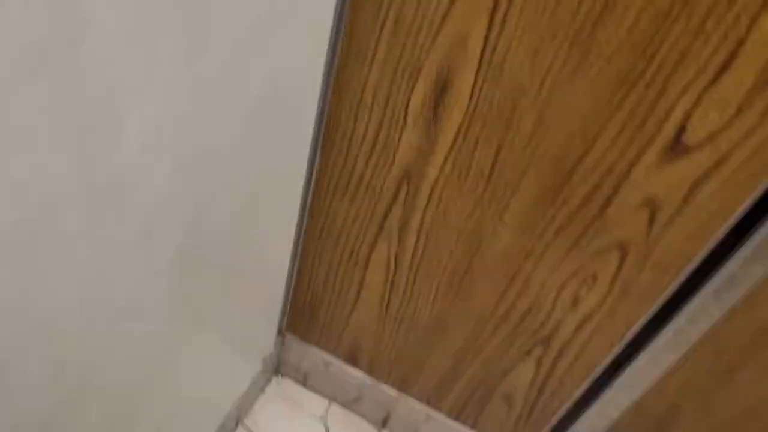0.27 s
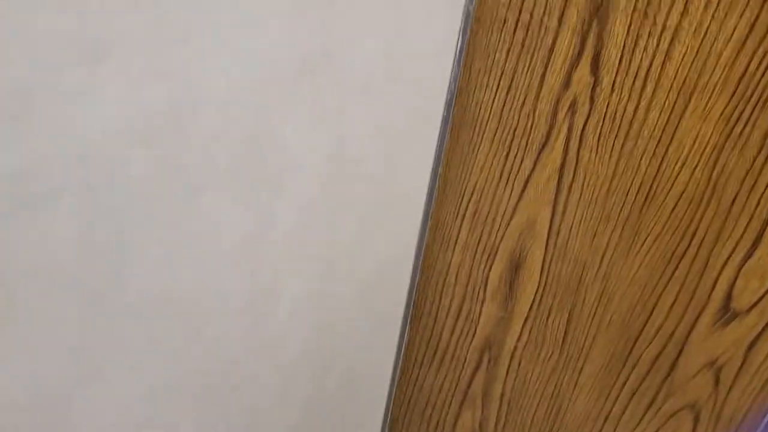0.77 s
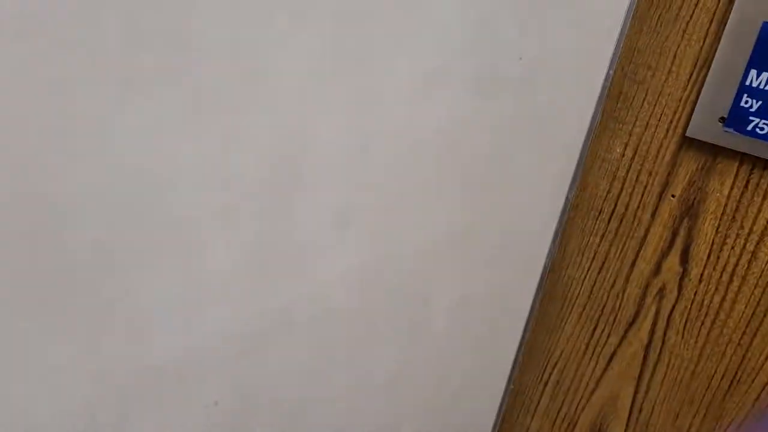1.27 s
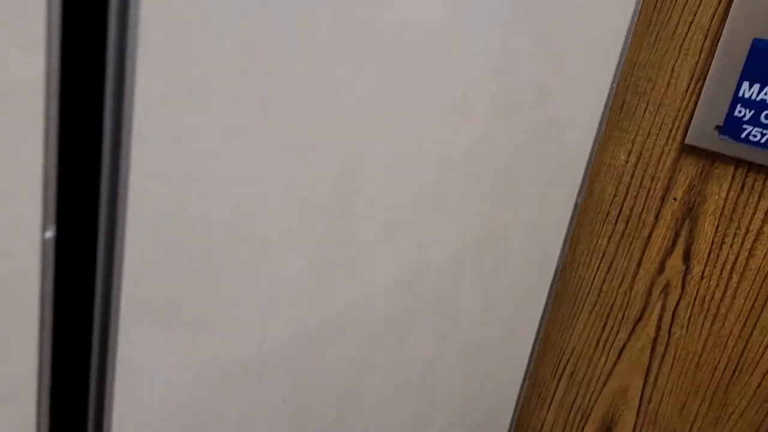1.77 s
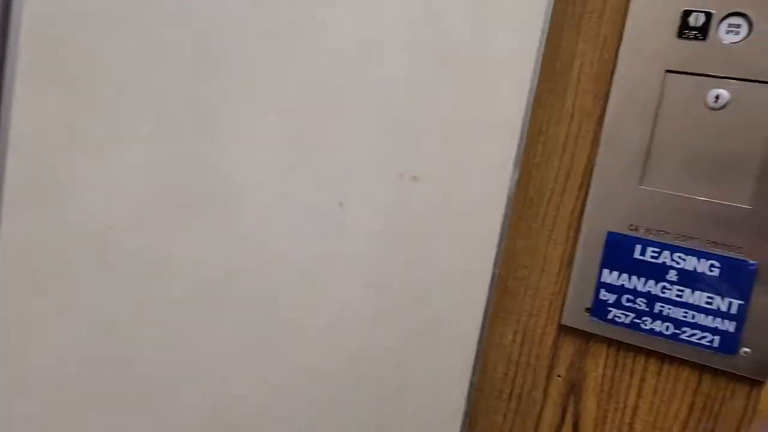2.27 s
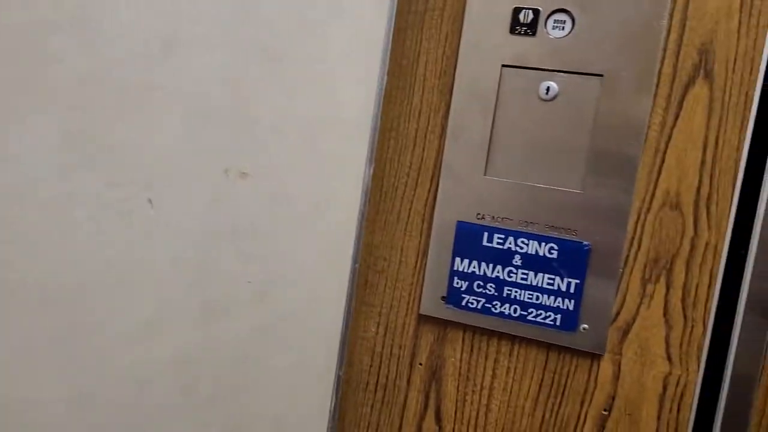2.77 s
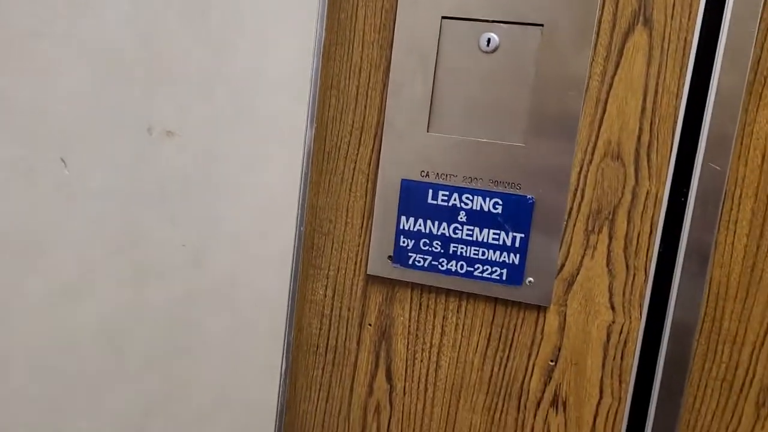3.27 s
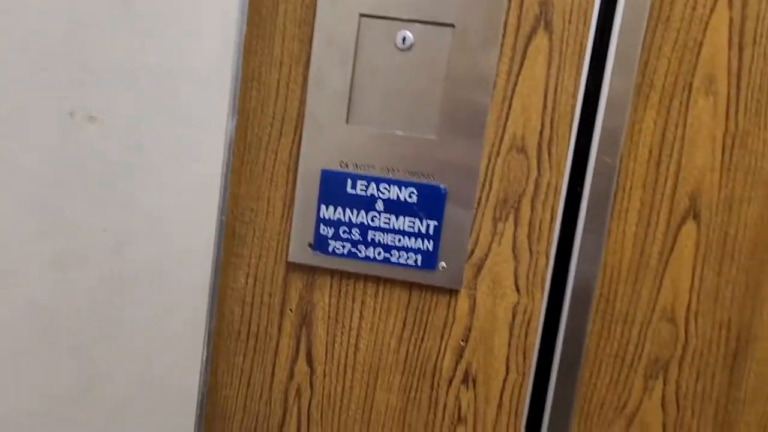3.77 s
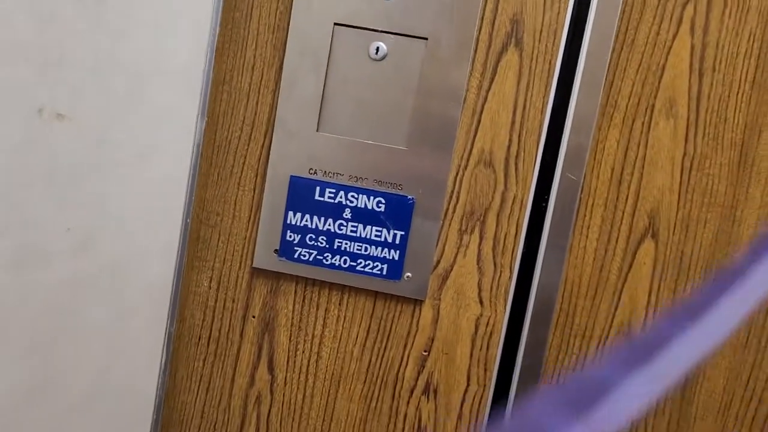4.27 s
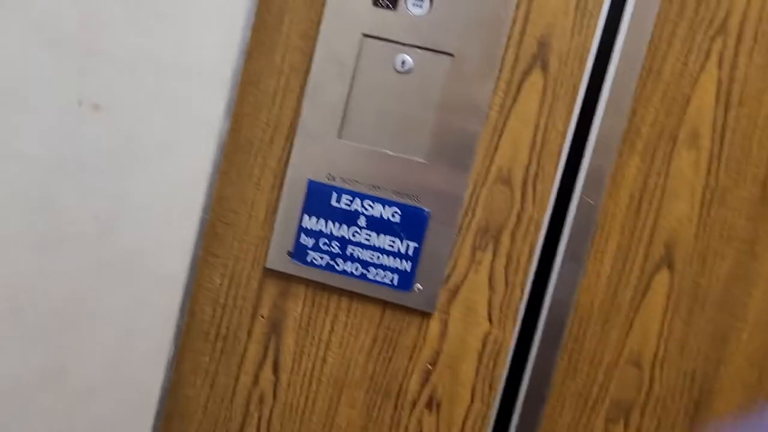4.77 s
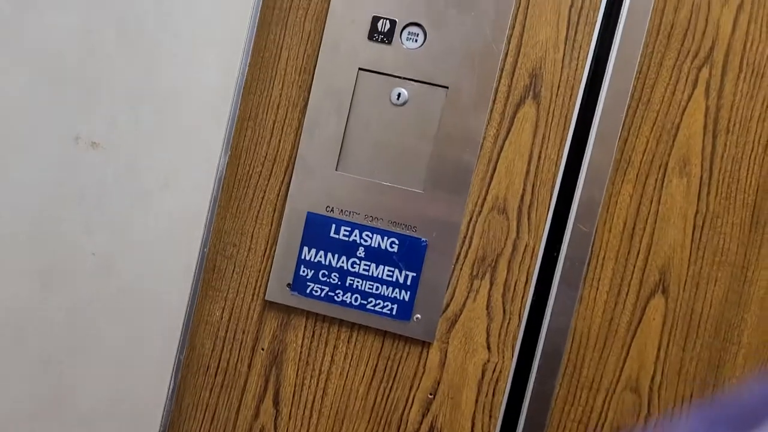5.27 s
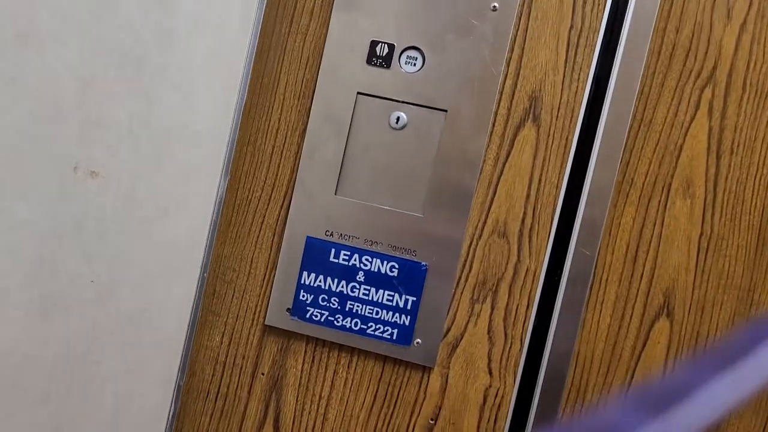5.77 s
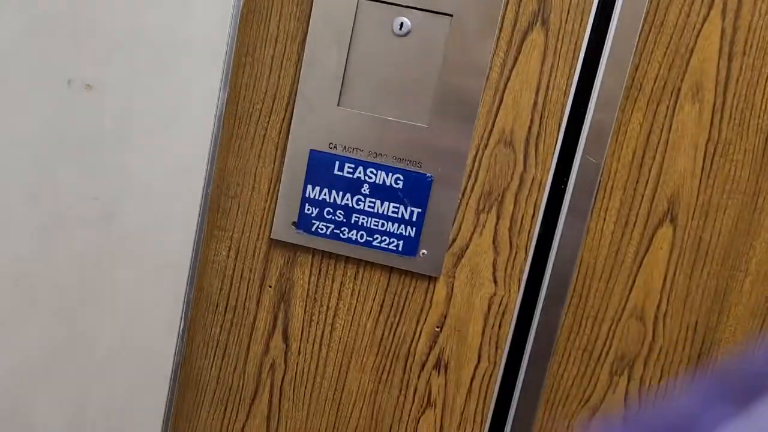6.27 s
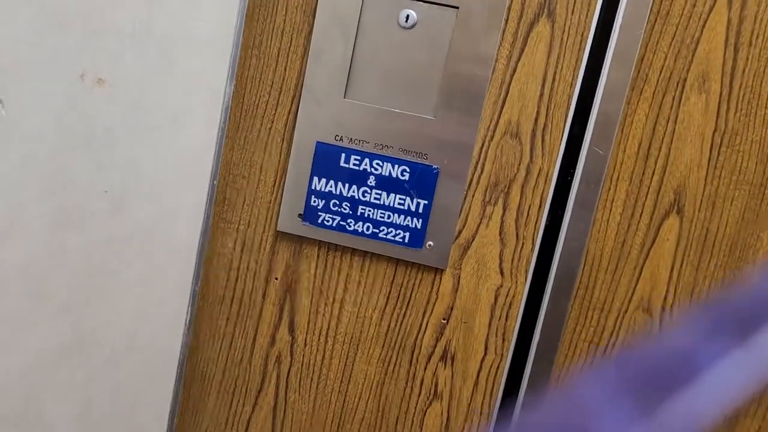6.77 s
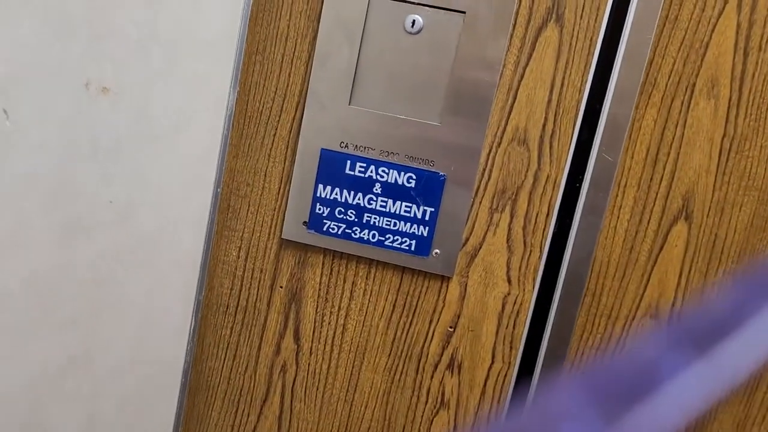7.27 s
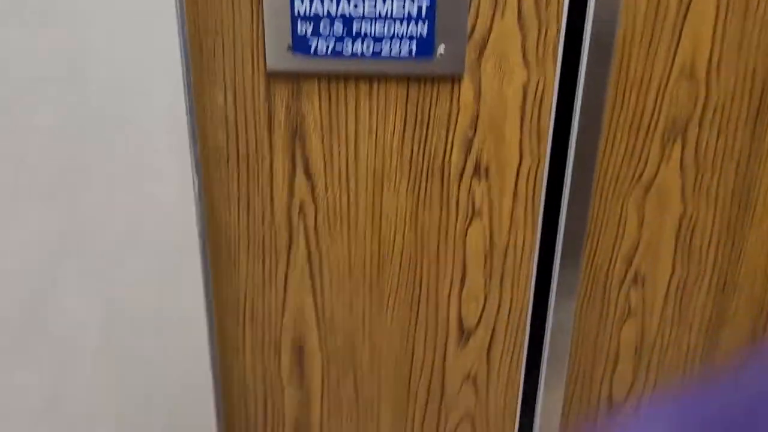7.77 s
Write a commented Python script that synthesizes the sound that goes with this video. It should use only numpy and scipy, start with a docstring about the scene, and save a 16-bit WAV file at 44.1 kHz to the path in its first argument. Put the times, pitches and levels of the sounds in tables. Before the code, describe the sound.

Sandals slap into a small old lift, booming the floor and clanking on a metal sill. A catch snaps, and the door scrapes and squeals faintly on its track, then rumbles shut on worn rollers with a few knocks. A low motor hum remains, with soft clothing rustle and small creaks. Near the end a strap rasps right beside the left of the microphone. Hard walls give everything a short, close echo.

```python
"""Sandals in a small old lift

Inside the cab, on a phone's stereo microphone, hard walls close all round. Sandals slap in, the floor
booms under the weight and a metal sill clanks. A catch snaps; the door rolls shut on worn rollers and
settles, leaving the motor humming through the panels. Clothes rustle, and near the end a strap rasps
right beside the left microphone port."""
import sys
import numpy as np
from scipy import signal
from scipy.fft import rfft, irfft, next_fast_len
from scipy.io import wavfile
from scipy.ndimage import uniform_filter1d

SR = 44100
rng = np.random.default_rng(int(sys.argv[2]) if len(sys.argv) > 2 else 0)


def int16_out(signal):
    """Quantize to a 16-bit WAV file."""
    q = np.round(np.clip(np.atleast_2d(signal).T, -1, 1) * 32767)
    wavfile.write(sys.argv[1], SR, q.astype(np.int16))


N = 353682
TIME = np.arange(N) / SR
CRACKLE_S = .02  # the longest decay of a contact's crackle

# Footfalls. Each row: start in seconds, slap in dB, treble tilt in dB per octave, contact in ms,
# floor boom in dB, panel shudder in dB, shudder decay in seconds.
STEPS = [(0.056, -33, -1, 5.1, -41.5, -51.5, 0.04), (0.13, -33.5, -1, 5.2, -43.5, -57, 0.025),
         (0.415, -31, 0, 8.1, -40.5, -47, 0.065), (0.703, -28, -0.5, 5.5, -24.5, -46, 0.72),
         (1.195, -48.5, -6, 4, -47, -50.5, 0.075), (1.259, -25, 0.5, 2.9, -33, -40, 0.11),
         (1.343, -28, -2.5, 4.9, -39, -44, 0.053), (1.594, -46, -6, 170, -45.5, -56.5, 0.083),
         (1.72, -34, -2, 16, -59, -34.5, 0.11), (1.746, -37, -3.5, 12, -49.5, -27.5, 0.027),
         (1.781, -28, -6.5, 20, -36.5, -28.5, 0.06), (1.9, -39.5, -12, 27, -32.5, -38, 0.14),
         (2.165, -43, -5.5, 0.32, -44.5, -44.5, 0.19), (2.334, -31, -3, 310, -46.5, -34, 0.066),
         (2.937, -54, -3.5, 3.3, -61, -45, 0.29), (3.038, -26, -0.5, 20, -37.5, -38, 0.017)]


def amp(db):
    """Decibels to gain."""
    return 10 ** (np.asarray(db) / 20)


def unit(x):
    """Scale to rms 1."""
    return x / np.sqrt(np.mean(x ** 2))


def blow(x, db):
    """Scale a transient so that its energy, spread over 20 ms, has this level."""
    return x * amp(db) * np.sqrt(SR / 50 / np.sum(x ** 2))


def lookup(hz, rows):
    """Read (Hz, value) rows on a log-frequency axis."""
    points, values = np.transpose(rows)
    return np.interp(np.log(hz + 1), np.log(points), values)


def colour(x, rows, tilt_db=0, size=8192):
    """Causal filter through (Hz, dB) points, treble tilted per octave; white noise keeps its power."""
    hz = np.fft.rfftfreq(size, 1 / SR)
    curve_db = lookup(hz, rows) + tilt_db * np.log2(1 + hz / 1000)
    cepstrum = irfft(np.log(amp(curve_db)))
    response = irfft(np.exp(rfft(2 * cepstrum[:size // 2], size)))  # minimum phase
    response /= np.linalg.norm(response)
    n = next_fast_len(x.shape[-1] + size)
    return irfft(rfft(x, n) * rfft(response, n), n)[..., :x.shape[-1]]


def noise(rows, channels=1):
    """Coloured noise, rms 1, unrelated between channels."""
    return unit(colour(rng.standard_normal((channels, N)), rows))


def wander(per_s):
    """Smooth random drift, rms 1, with per_s new values a second."""
    hold = int(SR / per_s)
    stairs = np.repeat(rng.standard_normal(N // hold + 1), hold)
    return unit(uniform_filter1d(uniform_filter1d(stairs, hold), hold)[:N])


def stroke(peak_s, rise_s, fall_s, roundness=0.6, t=TIME):
    """Gain of one movement: up 20 dB over rise_s to 1 at its peak, down 20 dB over fall_s."""
    away = np.maximum((peak_s - t) / rise_s, (t - peak_s) / fall_s)
    return amp(-20 * np.minimum(np.abs(away) ** roundness, 10))


def burst(decay_s):
    """A second of dense tiny impacts that die away."""
    return rng.standard_normal(SR) * np.exp(-TIME[:SR] / max(decay_s, 1 / SR))


def ring(modes):
    """A second of struck (Hz, dB, t60 in seconds) modes."""
    t = TIME[:SR]
    return sum(amp(db) * np.sin(2 * np.pi * hz * t) * np.exp(-np.log(1000) * t / t60)
               for hz, db, t60 in modes)


def resonance(hz, width_hz):
    """A short, rounded ring of a damped part."""
    t = TIME[:SR // 8]
    return t * np.exp(-np.pi * width_hz * t) * np.sin(2 * np.pi * hz * t)


def add(out, s, x):
    """Mix x into out at s seconds."""
    i = max(int(s * SR), 0)
    out[..., i:i + x.shape[-1]] += x[..., :N - i]


def echoes(contact_s=1e-5, spread=1.13, bass_spread=0.25, size=24576):
    """Close hard walls: a dense tail that builds during contact, alike at both ports only in the bass."""
    # How long the cab rings. Each row: frequency in Hz, t60 in seconds.
    ring_times = np.array([(150, 0.5), (500, 0.41), (1200, 0.36), (2500, 0.3), (5000, 0.25), (9000, 0.19),
                           (16000, 0.22)])
    t, hz = TIME[:size], np.fft.rfftfreq(size, 1 / SR)
    mid, side = rfft(rng.standard_normal((2, size)))
    width = np.hypot(bass_spread, spread * hz / np.hypot(hz, 560))
    field = (mid + width * side * np.array([[1], [-1]])) / np.hypot(1, width)
    tail = 0
    for share, (_, t60) in zip(np.eye(len(ring_times)), ring_times):
        band = lookup(hz, np.column_stack([ring_times[:, 0], share]))
        tail = tail + irfft(field * band) * np.exp(-np.log(1000) * t / t60)
    tail = tail * np.sqrt(1 - np.exp(-t / contact_s))
    return tail / np.linalg.norm(tail, axis=1, keepdims=True)


def cab(x, direct_db, bass_spread=0.22):
    """A source at the microphone: its direct sound, direct_db above the walls' echoes that follow."""
    response = echoes(bass_spread=bass_spread)
    response[:, 0] += amp(direct_db)
    return signal.fftconvolve(x[None], response / np.hypot(1, amp(direct_db)), axes=1)[:, :N]


def motor():
    """Wavering motor tones come through the walls over a bed of moving air."""
    # Motor tones, then the spectrum of the shaft's air. Each row: frequency in Hz, relative level in dB.
    tones = [(70, -79), (118.8, -73), (141, -79), (176.5, -77), (241, -78.5), (281, -81), (565, -100)]
    air_spectrum = [(20, -9.5), (60, -10), (90, -9), (120, 2.5), (200, -11), (285, -1.5), (340, -12),
                    (450, -15.5), (700, -26), (1200, -35), (4000, -40.5), (16000, -43)]
    # The rise and fall of both. Each row: time in seconds, gain in dB.
    swell = [(0, 17), (4.8, -2), (5.9, 1.5), (6.6, -3), (6.87, 0), (7.1, -2.5), (8.02, -6.5)]
    waver_hz, waver_db = 2.3, 2.9
    hum = 0
    for hz, db in tones:
        phase = 2 * np.pi * np.cumsum(hz + waver_hz * wander(7.7)) / SR
        hum = hum + np.sqrt(2) * amp(db + waver_db * wander(8.6)) * np.sin(phase)
    air = cab(amp(-71.0) * noise(air_spectrum)[0], direct_db=-0.5, bass_spread=0.43)
    return (hum + air) * amp(np.interp(TIME, *np.transpose(swell)))


def sway():
    """The cab rumbles on its ropes, most after each lurch and while the door rolls."""
    # Shifts of weight. Each row: peak in seconds, level in dB.
    lurches = [(0, -53.5), (.42, -54.5), (1.277, -46), (1.79, -39.5), (2.38, -51), (3.05, -45.5)]
    idle_db, door_share_db = -77, -14.5
    lurch_power = sum((amp(db) * stroke(s, rise_s=0.044, fall_s=0.68, roundness=0.88)) ** 2
                      for s, db in lurches)
    gain = np.sqrt(lurch_power + (amp(door_share_db) * door_effort()) ** 2 + amp(idle_db) ** 2)
    rumble = noise([(12, -25.0), (24, -1.5), (33, 7.5), (48, 3), (68, 1.5), (90, -18.0), (200, -64.5)])
    return amp([[-1.5], [1]]) * gain * rumble


def clothes():
    """Cloth slides on cloth with a fine, flickering hiss from all sides, some strokes brighter."""
    # The spectrum of cloth. Each row: frequency in Hz, relative level in dB.
    cloth = [(150, -1.5), (430, 5), (800, -0.5), (2000, 0), (3200, -5.5), (5500, -2), (7500, 1.5),
             (9000, -5.5), (12500, -3.5), (16000, -12)]
    # Swishes. Each row: peak in seconds, level in dB, rise and fall in seconds, tilt in dB per octave.
    swishes = [(0, -58.5, .3, 0.73, -2.4), (0.669, -57, 0.383, 0.57, -2.1), (1.622, -63, 0.27, 0.42, 0.2),
               (1.97, -52.5, 0.13, 0.23, -3.1), (2.4, -55.5, 0.44, 0.21, -5.5),
               (3.418, -72, 0.095, 0.72, -1.5), (4.54, -67.5, 0.39, 0.28, 1), (5.3, -70, 0.23, 0.91, 4.7),
               (5.62, -71, 1, 0.85, .4), (6.221, -72.5, 0.94, 0.55, -2), (7.19, -72, 0.34, 0.45, 3),
               (7.641, -67, 0.24, 0.4, -2.5), (8.0, -64.5, 0.18, .2, 0)]
    flicker_db = 1.8
    out = 0
    for s, db, rise_s, fall_s, tilt_db in swishes:
        hiss = colour(rng.standard_normal((2, N)), cloth, tilt_db)
        out = out + amp(db) * stroke(s, rise_s, fall_s, roundness=1.06) * hiss
    return out * amp(flicker_db * wander(35))


def squeal(phase, flutter_per_s=380):
    """Catching metal sings in a narrow resonance: a tone whose level and phase flutter."""
    return wander(flutter_per_s) * np.cos(phase) + wander(flutter_per_s) * np.sin(phase)


def door_track():
    """Dry metal scrapes along the door track and squeals, sinking in pitch as it slows."""
    # The scrape's spectrum. Each row: frequency in Hz, relative level in dB.
    spectrum = [(600, -20.5), (1450, -13), (1700, -17.5), (2120, -10), (2380, -14), (2600, -23.5),
                (3200, -26), (4000, -20.5), (5200, -27), (12000, -44)]
    # Slides. Each row: peak in seconds, scrape in dB, squeal in dB, rise and fall in seconds.
    slides = [(0.05, -65.5, -92, 0.83, 2.5), (1.05, -69, -68.5, 0.28, 0.72), (2.6, -79.5, -70, 0.34, 0.22),
              (3.47, -70.5, -80, 0.09, 0.47)]
    full_speed_hz, sag_hz, octave_db = 2114, 113, -21
    scraping, singing, speed = np.zeros((3, N))
    for s, scrape_db, squeal_db, rise_s, fall_s in slides:
        slide = stroke(s, rise_s, fall_s, roundness=1.25)
        scraping = np.hypot(scraping, amp(scrape_db) * slide)
        singing = np.hypot(singing, amp(squeal_db) * slide)
        speed = np.maximum(speed, slide)
    phase = 2 * np.pi * np.cumsum(full_speed_hz - sag_hz * (1 - speed) ** 2) / SR
    tone = squeal(phase) + amp(octave_db) * squeal(2 * phase)
    scrape = noise(spectrum, channels=2) * scraping * amp(4.6 * wander(23))
    return scrape + cab(tone * singing, direct_db=4.0)


def slap(db, tilt_db, contact_s, direct_db=-12):
    """A short crackle of contact, swallowed at once by its own echoes."""
    # The spectrum of a slap or click. Each row: frequency in Hz, relative level in dB.
    spectrum = [(120, -34), (300, -6), (500, -7.5), (660, -14), (950, -12), (1500, -15), (2300, -12.5),
                (5800, -12), (7600, -11), (9000, -17), (15000, -18)]
    tail = echoes(contact_s)
    crackle = unit(burst(min(contact_s, CRACKLE_S)))[:tail.shape[1]] / np.sqrt(SR)
    return blow(colour(tail + amp(direct_db) * crackle, spectrum, tilt_db), db)


def sandals_and_ticks():
    """Soles slap the floor among lighter scuffs and ticks; each sets the wall boards ringing."""
    # Light scuffs and crisp ticks, including the click of the catch.
    # Each row: start in seconds, level in dB, treble tilt in dB per octave, contact in ms.
    scuffs_and_ticks = [(0.612, -47.5, -7, 3.7), (0.984, -46, -11.5, 20), (1.21, -41, -6.5, 12.3),
                        (1.249, -38, -6.5, 3.1), (1.380, -30, -2, 2.2), (1.969, -44.5, -2.5, 17),
                        (2.312, -39.5, -6, 0.34), (2.967, -45, -0.5, 140), (7.585, -62, -4, .5)]
    # The boards' hollow modes. Each row: frequency in Hz, relative level in dB, t60 in seconds.
    boards = [(395, -7, 0.52), (476, -1.5, 0.36), (569, -4.5, 0.18), (799, -1, 0.13), (960, 1, 0.2),
              (1254, -1, .16), (2410, -3, .08), (3750, -0.5, .1), (4260, -2, 0.11)]
    out = np.zeros((2, N))
    for s, db, tilt_db, contact_ms, *_ in STEPS + scuffs_and_ticks:
        contact_s = contact_ms / 1000
        add(out, s, slap(db, tilt_db, contact_s))
        crackles = [burst(min(contact_s, CRACKLE_S))[:SR // 4] for port in range(2)]
        knock = np.array([signal.fftconvolve(crackle, ring(boards)) for crackle in crackles])
        add(out, s, blow(knock, db - 14.5))
    return out


def floor():
    """Just after each footfall's slap, body weight booms the floor and shakes the panels."""
    # Modes of the floor and walls. Each row: frequency in Hz, relative level in dB, t60 in seconds.
    modes = [(47, -20.5, .5), (117.97, -1.5, 0.69), (162.7, -12, 0.33), (237.5, -11, 0.51),
             (277.5, -6.5, 0.4), (303, -2.5, 0.4), (421, -14.5, 0.39), (510, -16.5, 0.34),
             (645, -18.5, 0.28)]
    # The spectrum of loose panels. Each row: frequency in Hz, relative level in dB.
    panels = [(20, -6), (35, 0), (65, -3.5), (95, -11), (117, 7), (145, -0.5), (163, -2), (188, -2.5),
              (215, -6), (280, 4), (370, -14), (480, -17.5), (700, -25), (1500, -49.5)]
    weight_lag_s, heel_load_s = .016, 0.0075  # a soft heel loads the floor gradually
    boom, shudder = np.zeros((2, N))
    thump = ring(modes) * (1 - np.exp(-TIME[:SR] / heel_load_s))
    for s, *_, boom_db, shudder_db, decay_s in STEPS:
        add(boom, s + weight_lag_s, amp(boom_db) * thump)
        add(shudder, s + weight_lag_s, amp(shudder_db) * colour(burst(decay_s), panels))
    return boom * amp([[.6], [-.6]]) + cab(shudder, direct_db=1.0, bass_spread=0.19)


def sill():
    """The metal sill clanks under a rubber sole, to the right of the microphone."""
    # The sill's modes. Each row: frequency in Hz, relative level in dB, t60 in seconds.
    modes = [(1990, -7, .06), (2067, -1, .1), (2105, 0, .11), (2200, -7, .06), (2850, -10, .04),
             (4690, -12, .05), (6900, -17, .1), (7490, -17, .1), (10280, -17, .1), (13600, -16, .045)]
    # Treads on the sill. Each row: start in seconds, level in dB before panning.
    treads = [(1.724, -35.5), (1.745, -39.5), (1.779, -44.5)]
    sole_load_s = 0.00084
    clank = ring(modes) * (1 - np.exp(-TIME[:SR] / sole_load_s))
    out = np.zeros((2, N))
    for s, db in treads:
        add(out, s, amp([[-.5], [4.5]]) * cab(blow(clank, db), direct_db=0.5))
    return out


def latch(start_s=2.3125):
    """A metal catch snaps once with a short, dull clack."""
    # Its damped resonances. Each row: frequency in Hz, relative level in dB.
    modes = [(942, -0.5), (2100, 2.5), (3074, -2), (3924, 0.5), (4683, -9), (6900, -15.5), (7900, -5.5)]
    clack = sum(amp(db) * resonance(hz, width_hz=420) for hz, db in modes)
    out = np.zeros((2, N))
    add(out, start_s, cab(blow(clack, db=-39), direct_db=-7.0))
    return out


def rubs():
    """Small ticks and creaks: brief spells of friction, each through one resonance."""
    # Each row: start in seconds, level in dB, resonance in Hz, decay in seconds.
    spells = [(2.347, -42, 1240, 0.03), (2.948, -55, 3750, 0.019), (4.235, -63, 682, 0.15),
              (4.8, -69, 680, 0.043), (5.070, -70.5, 1565, 0.052), (5.151, -66, 920, 0.0062),
              (5.637, -69.5, 960, .03), (6.04, -68, 1630, 0.032), (6.15, -64, 435, 0.15),
              (7.585, -61.5, 2760, 0.017)]
    out = np.zeros(N)
    for s, db, hz, decay_s in spells:
        rub = signal.fftconvolve(burst(decay_s), resonance(hz, width_hz=440))
        add(out, s, blow(rub, db))
    return cab(out, direct_db=-1.0)


def door_effort():
    """Gain of the door's run: it gathers speed, cruises, brakes, presses home and runs out."""
    cruise_s, brake_s, home_s = 3.23, 3.795, 4.55
    start_db_per_s, brake_db_per_s, runout_db_per_s = 153, 13.5, 43
    starting = start_db_per_s * np.maximum(cruise_s - TIME, 0)
    braking = brake_db_per_s * np.maximum(TIME - brake_s, 0)
    running_out = runout_db_per_s * np.maximum(TIME - home_s, 0)
    pressing = amp(-47.5) * stroke(home_s, rise_s=0.15, fall_s=0.032)
    return amp(-46.5 - starting - braking - running_out) + pressing


def door():
    """Worn rollers bump the leaf once a turn, and the gear knocks as the door settles."""
    # The door leaf's spectrum. Each row: frequency in Hz, relative level in dB.
    leaf = [(60, -25.5), (98, -12.5), (115, 8.5), (130, -8.5), (143, 10.5), (163, -14.5), (179, 6.5),
            (212, -18), (268, 4.5), (297, 4), (322, -4), (341, 3), (362, -21), (430, -10), (492, -12.5),
            (700, -29), (1200, -64.5)]
    # The rollers' hardest bumps. Each row: start in seconds, level in dB.
    hard_bumps = [(3.507, -53.5), (3.550, -48), (3.591, -45.5), (3.646, -49), (3.725, -50.5), (3.927, -52),
                  (4.262, -51.5)]
    # Knocks of the gear. Each row: start in seconds, thud in dB, thud pitch in Hz, click in dB.
    knocks = [(3.385, -46, 421, -57.5), (3.696, -49, 339, -64), (4.231, -54.5, 399, -74.5),
              (4.467, -57.5, 496, -63), (4.517, -65, 422, -56.5), (4.557, -60, 480, -57),
              (4.71, -65.5, 380, -66.5), (4.795, -61, 470, -65.5)]
    roller_hz, scatter_db = 23.41, 1
    turn = np.cumsum(roller_hz * (1 + .12 * wander(31))) / SR % 1
    push = unit(0.18 + np.exp(-turn / .16)) * rng.standard_normal(N)
    flat_spots = (np.diff(turn, prepend=0) < 0) * amp(scatter_db * rng.standard_normal(N))
    knock = resonance(hz=304, width_hz=210)
    bump = signal.fftconvolve(knock, knock)  # twice: the tyre softens the bump
    bumps = signal.fftconvolve(flat_spots, bump)[:N]
    rolling = (amp(-2.5) * unit(colour(push, leaf)) + amp(-16.5) * unit(bumps)) * door_effort()
    thuds, clicks = np.zeros(N), np.zeros((2, N))
    for s, db in hard_bumps:
        add(thuds, s, blow(bump, db))
    for s, thud_db, hz, click_db in knocks:
        add(thuds, s, blow(resonance(hz, width_hz=154), thud_db))
        add(clicks, s, slap(click_db, tilt_db=-7.0, contact_s=0.0011, direct_db=-2.0))
    return cab(rolling, direct_db=6.5, bass_spread=0.24) + cab(thuds, direct_db=7.5) + clicks


def strap(snags=9):
    """A strap creeps, then slips in even snags, sharp at the left port and thrown back by the walls."""
    # Spectra of the strap in the cab, right at the port, and of its low thud.
    # Each row: frequency in Hz, relative level in dB.
    in_cab = [(100, -16), (250, 0), (420, -11), (750, 2), (820, -2), (912, 7), (1050, -3), (2050, -8),
              (2850, -1), (3270, -3), (3520, -17), (4050, 7), (6000, -1), (7500, 4), (9000, -1.5),
              (12000, 1), (16000, -11)]
    at_port = [(300, -25), (2800, -17.5), (3520, -11.5), (4000, -7), (7000, -7), (10000, -1), (16000, -6)]
    bass = [(60, -39), (125, 7), (170, -13), (245, 9), (340, -6), (600, -21), (1500, -51)]
    start_s, gap_s, base_db = 7.6818, .00788, -44
    out = np.zeros((2, N))
    for s in start_s + gap_s * np.arange(snags):
        pull = stroke(peak_s=7.701, rise_s=.031, fall_s=.048, roundness=4.8, t=s)
        snag = blow(burst(0.0002) + 0.35 * burst(0.0045), base_db)
        add(out, s, pull * colour(snag, at_port) * amp([[8.5], [-10]]))
        thrown_back = colour(echoes(contact_s=0.026), in_cab)
        add(out, s, pull * blow(thrown_back, base_db + 6.5))
    creep = unit(colour(rng.standard_normal((2, N)), in_cab, tilt_db=-8.5))
    out += amp(-59) * creep * stroke(start_s, rise_s=0.17, fall_s=0.079, roundness=1.15)
    thud = colour(echoes(contact_s=0.0052), bass)
    add(out, start_s + 0.055, blow(thud, db=-48))  # the walls' bass arrives late
    return out


def scene():
    """Everything in the cab; the low sounds lean a little to the left."""
    bright = sandals_and_ticks() + sill() + latch() + clothes() + rubs() + door_track() + strap()
    low = floor() + sway() + door() + motor()
    return bright + amp([[.3], [-.3]]) * low


def record(dry):
    """The phone cuts the top treble steeply."""
    top_hz = 16200
    return signal.sosfilt(signal.ellip(10, .2, 70, top_hz, fs=SR, output="sos"), dry)


dry = scene()
out = record(dry)
int16_out(out)
```